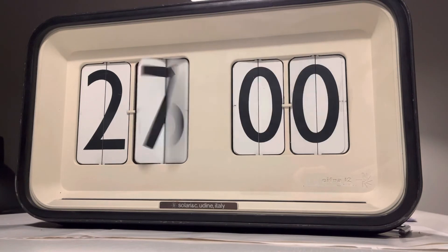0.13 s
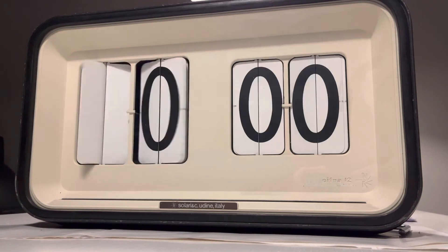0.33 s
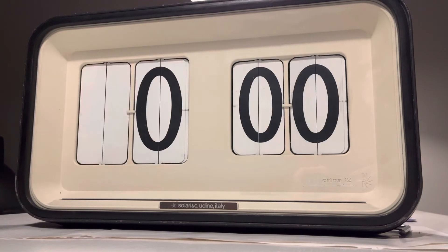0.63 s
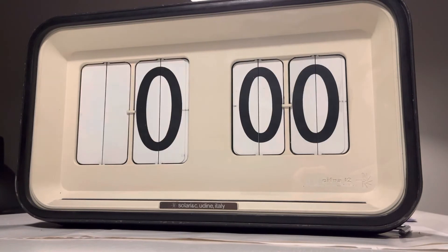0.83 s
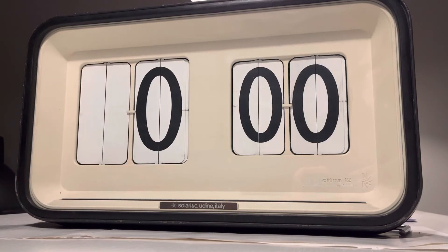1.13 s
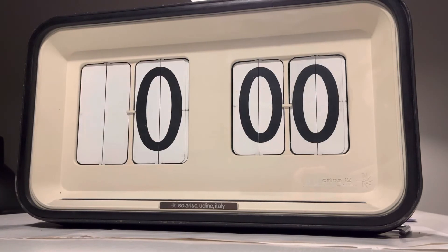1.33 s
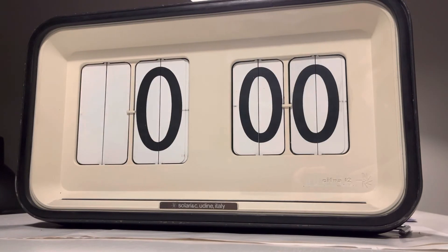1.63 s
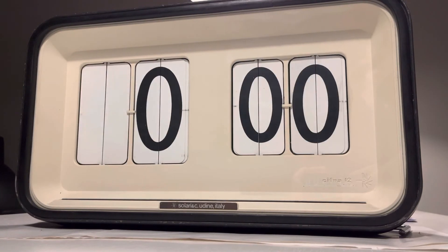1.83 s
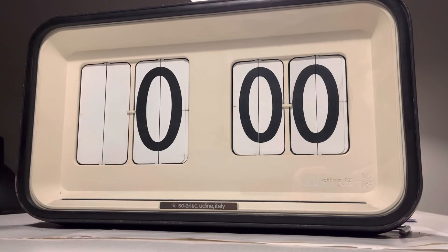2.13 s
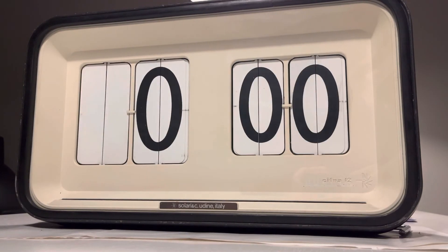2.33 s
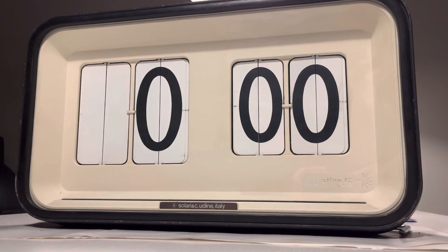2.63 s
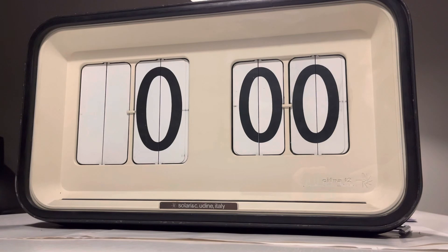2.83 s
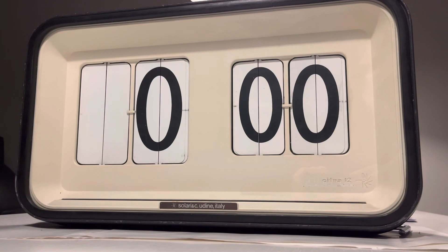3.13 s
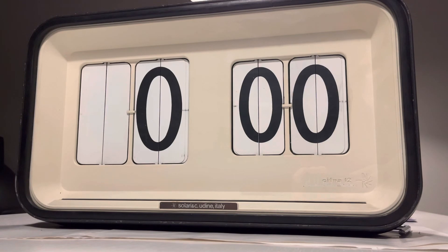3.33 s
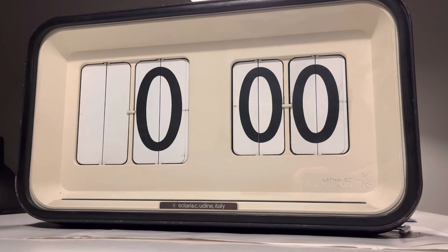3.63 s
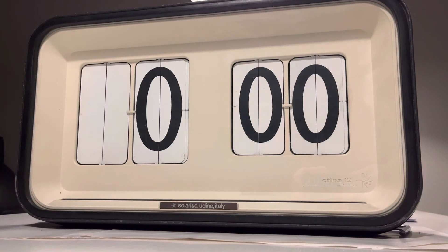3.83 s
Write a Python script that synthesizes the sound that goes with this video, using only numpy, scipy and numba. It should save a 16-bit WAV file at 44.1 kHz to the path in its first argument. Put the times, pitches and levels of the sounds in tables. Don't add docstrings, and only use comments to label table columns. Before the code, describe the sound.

A mechanical flip clock slaps over all its digits, then ticks very softly in a room.

```python
import sys
import numpy as np
from scipy import signal
from scipy.fft import rfft, irfft
from scipy.io import wavfile
from scipy.ndimage import uniform_filter1d
from numba import njit

SR = 44100
rng = np.random.default_rng(int(sys.argv[2]) if len(sys.argv) > 2 else 0)


def invert_db(level):
    return 10 ** (np.asarray(level, dtype=float) / 20)


def generate_wav(signal):
    frames = np.transpose(np.atleast_2d(signal))
    scaled = np.clip(frames, -1, 1) * 32767
    pcm = np.round(scaled).astype(np.int16)
    wavfile.write(sys.argv[1], SR, pcm)


N = 176400

# time in seconds, tooth chatter in dB, boom in dB.
DRIVE = [
    (0.0, -23, -27),
    (0.04, -26.5, -30.5),
    (0.059, -27, -32.5),
    (0.171, -42, -27.5),
    (0.218, -38.5, -39.5),
    (0.277, -34.5, -37.5),
    (0.348, -45.5, -52),
    (0.408, -41.5, -44.5),
    (0.54, -57, -57),
]
# start in seconds, level in dB, slap pitch in Hz, case knock in dB.
FLAP_SLAPS = [(0.0234, -24, 4370, -25.5), (0.0689, -18.5, 3520, -53.5), (0.1141, -20, 3900, -27.5),
              (0.151, -23, 4230, -39.5), (0.18, -21, 3030, -31.5), (0.203, -29.5, 4500, -21),
              (0.2265, -24.5, 3480, -38), (0.2811, -34, 3880, -35), (0.3197, -31, 3580, -47),
              (0.365, -34, 2930, -36), (0.388, -33, 3630, -35.5), (0.408, -37.5, 3280, -51)]
# start in seconds, level in dB, pitch of the struck part in Hz.
HARD_KNOCKS = [(0.008, -24.5, 544.4), (0.027, -20, 603.7), (0.036, -21.5, 1010), (0.049, -23.5, 598.3),
               (0.074, -25, 877), (0.083, -30.5, 571.3), (0.094, -27, 954.7), (0.13, -24.5, 648),
               (0.138, -24, 579.2), (0.171, -25, 1110), (0.193, -22.5, 1124), (0.203, -26, 776),
               (0.235, -27, 550.4), (0.245, -28, 904.2), (0.279, -29.5, 681), (0.3, -30, 873.3),
               (0.332, -36, 967), (0.392, -33.5, 572.2), (0.42, -36.5, 960), (0.458, -41, 770),
               (0.524, -41.5, 783)]
# time in seconds, level in dB.
UNLOCKS = [(0.7986, -62), (0.997, -73), (1.1994, -64.5), (1.3964, -69.5), (1.5975, -63.5), (1.7791, -82),
           (1.7981, -69), (1.9794, -72), (1.9974, -65), (2.1828, -77), (2.1971, -67), (2.3985, -65.5),
           (2.5962, -67), (2.7968, -65.5), (2.996, -65), (3.1976, -60.5), (3.3967, -69.5), (3.6, -64),
           (3.7971, -65.5), (3.9944, -64.5)]
# time in seconds, level in dB, extra wheel ring in dB.
DROPS = [(0.607, -54.5, 5), (0.8045, -65.5, -4), (1.0064, -60.5, 0), (1.2052, -67.5, -1),
         (1.406, -60, -0.5), (1.6054, -73, 0), (1.8062, -62.5, -4), (2.007, -64, 1.5), (2.2073, -60.5, 0.5),
         (2.4055, -64.5, -1), (2.606, -60.5, -3), (2.805, -68.5, 5), (3.0068, -59, -0.5),
         (3.2054, -65.5, -6), (3.4064, -60, -0.5), (3.6042, -68, -1), (3.807, -58, 0.5)]
# pitch in Hz, level in dB, t60 in seconds.
FLAP_MODES = [(2963, -7, 0.025), (3453, -5, .03), (3770, -14.5, 0.1519), (4510, -2, 0.018),
              (5980, -15, .02)]
CASE_MODES = [(211.3, -5, 0.18), (271.3, -6, 0.15), (307, -1.5, 0.13), (429.4, -12, 0.17), (573, -3.5, .14),
              (650, -11, 0.05), (777, -9, 0.21), (892, -6.5, 0.16), (1009, -7, 0.3), (1049, -5.5, .2),
              (1136, -8.5, .3), (1278, -4.5, .1), (1577, -7, .06)]
BOOM_MODES = [(50, -20.5, 0.34), (67, -16.5, 0.72), (90.9, 2, 0.44), (131.53, -3.5, 0.58), (170, -3, .25)]
PLATE_MODES = [(279.8, -2, 0.098), (392.3, -8.5, 0.23), (609.5, 5, 0.11), (720, -0.5, 0.082),
               (815.6, -14, 0.43), (1090, -8.5, 0.24), (1258, 1, 0.2), (1521, -9.5, 0.069),
               (1508, -14.5, 0.08), (1844, 2.5, 0.031), (1968, 1.5, 0.026)]
WHEEL_MODES = [(3350, -5, .03), (3756, 0.5, 0.031), (4500, -0.5, 0.038)]
# frequency in Hz, level in dB.
SHELL_COLOUR = [(90, -4), (1150, -1), (2300, -11.5), (3200, -8), (4600, -14), (7400, -14.5), (9300, -15),
                (15500, -26)]
# frequency in Hz, t60 in seconds.
SHELL_T60 = [(300, 0.13), (1500, 0.045), (4000, 0.17), (9000, 0.064), (14000, .03)]
# frequency in Hz, level in dB.
FRAME_COLOUR = [(200, -4.5), (500, 5.5), (1000, 0), (1500, -2), (2100, -24.5), (2500, -25)]
# frequency in Hz, t60 in seconds.
FRAME_T60 = [(300, 0.48), (1000, 0.11), (2000, 0.057)]
# pitch in Hz, width in Hz, level in dB.
HUM_TONES = [(118.3, 1.5, -67), (136.48, 1.8, -73.5), (100, 3.4, -72), (221, 9.034, -75), (701, 3.5, -86)]
# frequency in Hz, density in dB per Hz.
MURMUR_COLOUR = [(15, -45), (25, -3), (121, 1.5), (179, -2.5), (462, -12), (553, -23), (697, -25.5),
                 (1110, -29), (1800, -44.5), (2340, -65.5), (3960, -120)]
HISS_COLOUR = [(700, -31), (1000, -6), (1900, -4.5), (4450, -6.5), (7200, -13), (8500, -29), (9300, -13.5),
               (11000, -14)]
# frequency in Hz, side over mid in dB.
SIDE_OVER_MID = [(60, -11), (370, -9.5), (680, -3), (6500, -1.5), (8500, 15), (9400, 2), (10500, -3.5),
                 (11300, -21.5)]
# frequency in Hz, first over second port in dB.
PORT_DB = [(100, 2), (900, 2.5), (1350, -4), (1900, 1), (4500, 3.5), (5700, 4), (7500, 0), (14000, 0)]
# frequency in Hz, phase in radians.
PORT_RAD = [(760, 0), (1850, -6.0), (5300, -5.9), (7600, -9.33), (8900, -9.5), (11100, -12.5),
            (12950, -12.6), (14300, -15.7)]
# frequency in Hz, level in dB.
APART_DB = [(100, -15.5), (350, -10.5), (950, -4.5), (2000, -9.5), (2500, -7.5), (5400, -4), (7500, -25.5),
            (14000, -28.5)]

RATTLE_S, RATTLE_PER_S, CHATTER_PER_S = 0.023, 4500, 3000
SETTLE_DB = -79.5
ROOM_T60_S, ROOM_DAMP, ROOM_DB, TICK_ROOM_DB = 0.49, 0.15, -13, -6.5
MURMUR_DB, HISS_DB = -68.5, -87.5
FADE_DB_PER_S, HUM_FADE_DB_PER_S = -1.5, -5.5
FIRST_ROW_ONLY = np.array([[1], [0]])


def level(x, db):
    return x * invert_db(db) / np.sqrt(np.mean(x ** 2))


def across(table, hz):
    table = np.array(table)
    return np.interp(np.log(hz + 1), np.log(table[:, 0]), table[:, 1])


def walk(rate_hz):
    k = int(SR / rate_hz)
    steps = np.repeat(rng.standard_normal(N // k + 1), k)
    return 1.2 * uniform_filter1d(uniform_filter1d(steps, k), k)[:N]


def clicks(per_s, spread_db):
    chance, side, size = rng.random((3, N))
    size_db = np.minimum(-spread_db * np.log(size + 1e-9), 9)
    return level((chance < per_s / SR) * np.sign(side - .5) * invert_db(size_db), 0)


def blows(rows, length_s, rise_s):
    t, out = np.arange(N) / SR, np.zeros(N)
    for s, db in rows:
        since = np.clip(t - s, 0, 1)
        out += invert_db(db) * np.exp(-since / length_s) * (1 - np.exp(-since / rise_s)) * (t - s < 1)
    return out


def pulses(rows, late_s, width_s):
    t, out = np.arange(N) / SR, np.zeros(N)
    for s, db in rows:
        k = max(int((s + late_s) * SR) - 100, 0)
        off = (t[k:k + 200] - s - late_s) / width_s
        out[k:k + 200] += invert_db(db) * np.exp(-.5 * off ** 2) * 4e-5 / width_s
    return out


@njit
def mode(x, re, im):
    y, z, p = np.empty(len(x)), 0j, re + 1j * im
    for i in range(len(x)):
        z = z * p + x[i]
        y[i] = z.imag
    return y


def ring(x, modes):
    out = 0
    for k, (hz, db, t60_s) in enumerate(modes):
        pole = np.exp((2j * np.pi * hz - np.log(1000) / t60_s) / SR)
        out = out + (-1) ** k * invert_db(db) * mode(x + 1e-18, pole.real, pole.imag)
    return out


def diffuse(x, colour, t60s, patchy_db, count):
    out = 0
    for hz in 80 * 2 ** (np.arange(count) / 3):
        sos = signal.butter(2, [hz / 1.12, hz * 1.12], "band", fs=SR, output="sos")
        band = signal.sosfilt(sos, rng.standard_normal((2, len(x))))
        keep = invert_db(-120 / SR / np.clip(across(t60s, hz), .003, 1))
        energy = signal.lfilter([1 - keep], [1, -keep], x ** 2)
        gain = invert_db(across(colour, hz) + patchy_db * walk(45)[:len(x)])
        out = out + gain * band * np.sqrt(energy)
    return out


def gears():
    t, rows = np.arange(N) / SR, np.array(DRIVE)
    chatter, boom = [invert_db(np.interp(t, rows[:, 0], rows[:, k], right=-140)) for k in (1, 2)]
    teeth = clicks(CHATTER_PER_S, 0.83) * chatter
    thuds = clicks(300, 5.7) * boom
    body = invert_db(-34) * ring(teeth[:SR], CASE_MODES) + invert_db(-34.5) * ring(thuds[:SR], BOOM_MODES)
    return teeth, np.pad(body, (0, N - SR))


def flaps(teeth):
    end = SR
    rattle = clicks(RATTLE_PER_S, 6.0)
    slaps = [row[:2] for row in FLAP_SLAPS]
    slap_env = blows(slaps, RATTLE_S, 0.00054) + invert_db(-2.5) * blows(slaps, 0.0021, 0.00012)
    shake = (rattle * slap_env + invert_db(-1) * teeth)[:end]
    sheet = ring(shake, FLAP_MODES) * invert_db(-37.5)
    for s, db, hz, _ in FLAP_SLAPS:
        crack = invert_db(1) * pulses([(s, db)], .0012, 3e-5) + rattle * blows([(s, db)], 0.0053, 0.00042)
        sheet += ring(crack[:end], [(hz, -25, .018), (hz * 1.22, -27, .015), (hz * 1.5, -30, .012)])
    for s, db, hz in HARD_KNOCKS:
        hit = pulses([(s, db)], .0004, 4e-5)[:end]
        sheet += ring(hit, [(hz, -19, .045), (hz * 1.7, -18, .01), (hz * 2.6, -17, .004)])
    knock = clicks(1900, 0.83) * blows([(row[0], row[3]) for row in FLAP_SLAPS], 0.0098, 0.00059)
    sheet += invert_db(-33.5) * ring(knock[:end], CASE_MODES)
    shell = diffuse(shake, SHELL_COLOUR, SHELL_T60, patchy_db=2.5, count=24)
    both = invert_db(1.5) * shell + sheet * FIRST_ROW_ONLY
    return np.pad(both, ((0, 0), (0, N - end)))


@njit
def walls(x, lags, gain, damp):
    line, soft, out = np.zeros((8, 4096)), np.zeros(8), np.zeros((2, len(x)))
    for i in range(len(x)):
        total = 0.
        for k in range(8):
            soft[k] += (1 - damp) * (gain[k] * line[k, (i - lags[k]) & 4095] - soft[k])
            total += soft[k]
            out[k % 2, i] += soft[k]
        for k in range(8):
            line[k, i & 4095] = x[i] + soft[k] - total / 4
    return out


def hum():
    t, tones = np.arange(N) / SR, 0
    for hz, width_hz, db in HUM_TONES:
        t60_s = np.log(1000) / np.pi / width_hz
        tones = tones + level(ring(rng.standard_normal(N), [(hz, 0, t60_s)]), db)
    return tones * invert_db(HUM_FADE_DB_PER_S * (t - 1.5))


def murmur(colour, db, flicker_db):
    hz = np.arange(N // 2 + 1) * SR / N
    mid_db = across(colour, hz)
    side_db = mid_db + across(SIDE_OVER_MID, hz)
    mid, side = [irfft(rfft(rng.standard_normal(N)) * invert_db(d), N) for d in (mid_db, side_db)]
    return level(mid + side * np.array([[1], [-1]]), db) * invert_db(flicker_db * walk(10))


def wheel_fall(rows):
    touch = pulses(rows, -0.001963, 3e-5)
    impact = invert_db(-3.5) * pulses(rows, -0.00017, 3e-5)
    bounce = invert_db(-9) * pulses(rows, 0.001416, 3e-5)
    return touch - impact + bounce


def escapement():
    unlock = pulses(UNLOCKS, -.001, 7e-5) - invert_db(-2.5) * pulses(UNLOCKS, 0.00073, 7e-5)
    both = invert_db(-1.0) * unlock + wheel_fall([row[:2] for row in DROPS])
    wheel = wheel_fall([(s, db + ring_db) for s, db, ring_db in DROPS]) + invert_db(-8) * unlock
    settle = clicks(250, 1.8) * blows([(row[0] + 0.0055, SETTLE_DB) for row in DROPS], 0.014, 0.0068)
    plate = invert_db(-20) * ring(both, PLATE_MODES) + invert_db(-27) * ring(wheel, WHEEL_MODES)
    frame = diffuse(invert_db(-4) * both + settle, FRAME_COLOUR, FRAME_T60, patchy_db=2.5, count=16)
    return invert_db(24.5) * frame + plate * FIRST_ROW_ONLY


def ports(x, apart):
    size = N + SR // 4
    hz = np.arange(size // 2 + 1) * SR / size
    half = invert_db(across(PORT_DB, hz) / 2) * np.exp(.5j * across(PORT_RAD, hz))
    shared = rfft(x, size)
    unlike = rfft(apart, size) * invert_db(across(APART_DB, hz))
    return np.array([irfft((shared + unlike) * half, size)[:N], irfft((shared - unlike) / half, size)[:N]])


def scene():
    teeth, case = gears()
    change, ticks = flaps(teeth), escapement()
    clock, apart = change + ticks
    clock = clock + case
    lags = np.array([661, 853, 1103, 1327, 1613, 1907, 2239, 2593])
    to_room = change[0] + case + invert_db(TICK_ROOM_DB) * ticks[0]
    echo = invert_db(ROOM_DB) * walls(to_room, lags, invert_db(-60 * lags / SR / ROOM_T60_S), ROOM_DAMP)
    heard = ports(clock + hum() + echo[0], invert_db(4) * apart + echo[1])
    fade = invert_db(FADE_DB_PER_S * (np.arange(N) / SR - 2.5))
    room = fade * murmur(MURMUR_COLOUR, MURMUR_DB, 1.1)
    hiss_cut = signal.butter(12, 13000, fs=SR, output="sos")
    return heard + room + signal.sosfilt(hiss_cut, murmur(HISS_COLOUR, HISS_DB, 0.37))


def band_limit(x):
    return signal.sosfilt(signal.butter(12, 15760, fs=SR, output="sos"), x)


def record(dry):
    low_cut = signal.butter(4, 42, "high", fs=SR, output="sos")
    return band_limit(signal.sosfilt(low_cut, dry))


dry = scene()
out = record(dry)
generate_wav(out)
```